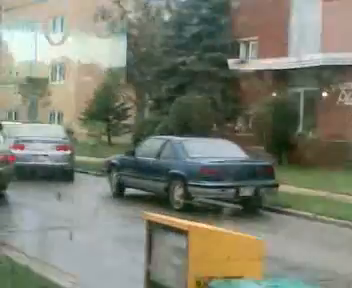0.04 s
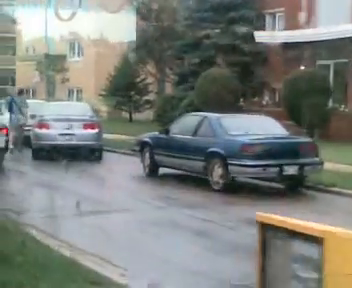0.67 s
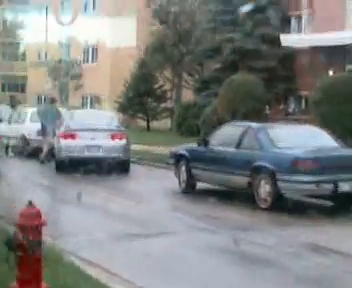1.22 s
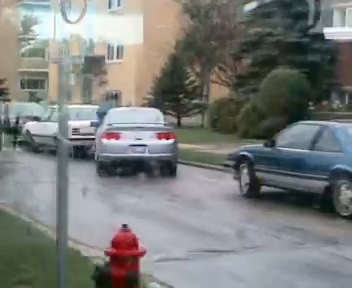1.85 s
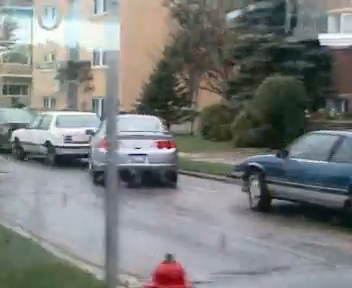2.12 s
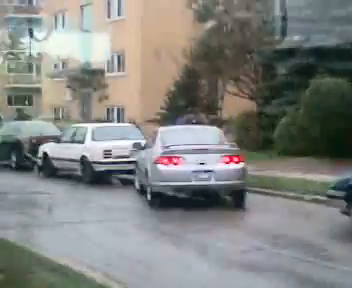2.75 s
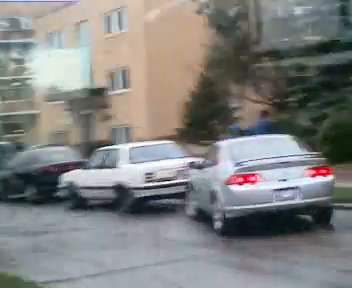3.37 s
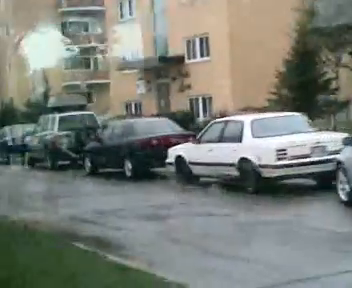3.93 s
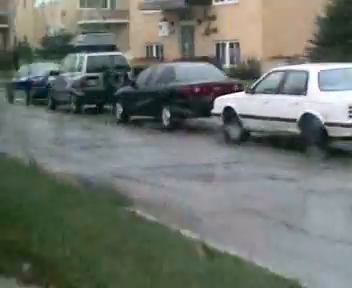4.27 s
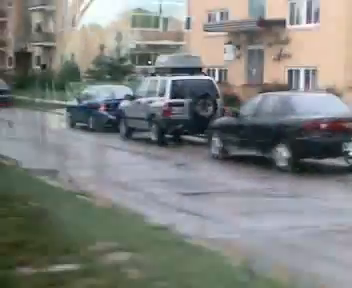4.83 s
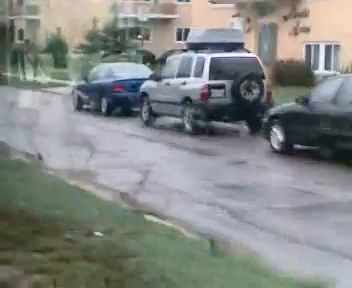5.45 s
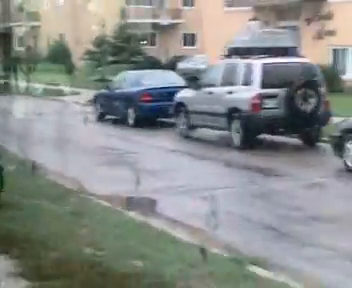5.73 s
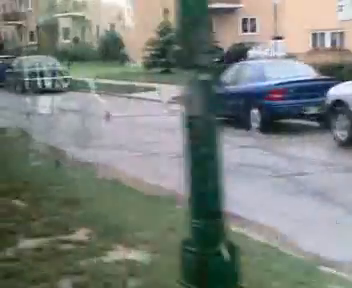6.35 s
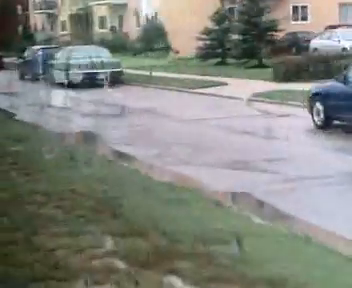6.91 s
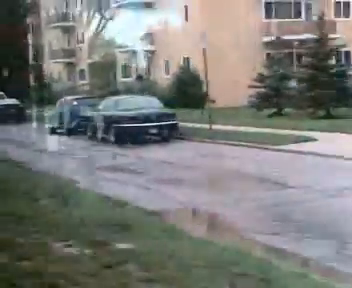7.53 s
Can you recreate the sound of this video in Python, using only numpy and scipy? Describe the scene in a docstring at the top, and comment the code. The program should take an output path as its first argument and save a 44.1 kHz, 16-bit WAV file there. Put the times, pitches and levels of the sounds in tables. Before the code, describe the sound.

Heard from a seat inside a city bus, the diesel engine pulls away with a deep, booming drone that rises steadily in pitch. The wheels thump dully over seams in the wet street, shaking loose fittings and throwing brief spray. After about five seconds the engine shifts up, drops a little and pulls on over road rumble. Near the end, compressed air hisses softly.

```python
"""City bus on a wet street

From a seat inside: the six-cylinder diesel pulls away, shifts up at 5.2 s and pulls on. Its orders boom
as they sweep through the cabin's resonances, over road rumble and combustion clatter. Below the floor
the wheels thump over seams, shake loose fittings and throw spray; near the end compressed air hisses."""
import sys
import numpy as np
from scipy import signal
from scipy.fft import rfft, irfft
from scipy.io import wavfile

SR = 44100
rng = np.random.default_rng(int(sys.argv[2]) if len(sys.argv) > 2 else 0)


def unload_wav(signal):
    """Save mono or channel-first audio to the path in sys.argv[1] as 16-bit WAV at rate SR, clipped to [-1, 1]."""
    wavfile.write(
        sys.argv[1],
        SR,
        np.round(np.clip(np.atleast_2d(signal).T, -1, 1) * 32767).astype(np.int16),
    )


N = 338688
TIME = np.arange(N) / SR

# The crank climbs until the upshift. Each row: time in seconds, speed in turns per second.
CRANK_SPEED = [(0.0, 17.6), (0.3, 19.2), (0.8, 21.03), (1.3, 23.33), (1.75, 24.72), (2.26, 26.36),
               (2.87, 28.02), (3.35, 29.48), (3.86, 30.72), (4.5, 31.45), (5.12, 32.25), (5.22, 31.3),
               (5.38, 30.35), (5.55, 29.78), (5.98, 29.09), (6.46, 29.07), (7.43, 29.49), (7.68, 29.5)]
# Level laws, ahead of cabin gain and swells. Each pair: dB at CRUISE, dB per extra turn per second.
CRUISE = 30  # crank turns per second
FIRING, UNEVEN_FIRING = (-17, 0.57), (-35.5, 0.06)
FIRING_2ND, FIRING_3RD, FIRING_4TH, FIRING_5TH = (-30, 0.98), (-40.5, -0.6), (-50, -1), (-44.5, 0.56)
FAN, FAN_OCTAVE, PUMP, RUMBLE = (-27, 1), (-37.5, 0.4), (-42.5, 1.2), (-38, 0.66)
SHAFT_SHAKE, SHAFT_NINTH, SHAFT_HUM = (-50, 1), (-43, 3), (-33.5, 1)
# The engine strains twice. Each row: start in seconds, length in seconds, gain in dB.
STRAINS = [(1.09, 0.43, 5.5), (2.04, 0.69, 2.5)]
# Single tones surge or ease. Each row: start and length in seconds, crank multiple, gain in dB.
SURGES = [(0, 0.67, 9, -5), (0.025, 0.39, 12, -5), (1.027, 0.25, 10, 3.5), (1.3, 0.4, 10, -7),
          (1.654, 0.23, 15, 7.5), (1.8, .38, 18.6, 14), (2.1, 0.35, 8.6, 3), (2.45, 0.45, 18.6, -4.5),
          (2.48, 0.77, 8.6, -5), (3.3, 0.42, 9, -2.5), (6.552, 3.7, 20, 7)]
# Weak low orders of crank and camshaft: their crank multiples, then their base levels in dB.
WEAK_ORDERS = [1.5, 2, 2.5, 3.5, 4, 5, 5.5, 6.5, 7.5, 8, 11, 13]
WEAK_DB = [-48, -42, -45.5, -43, -53.5, -41.5, -48, -46.5, -46, -44, -58, -52.5]
# High orders of engine and fan: their crank multiples, then their base levels in dB.
HIGH_ORDERS = [21, 22, 24, 25.5, 27, 28.5, 30, 31.5, 33, 34.5, 36, 37.5, 40, 42, 45]
HIGH_DB = [-60, -64, -61, -58.5, -61.5, -59.5, -55.5, -63, -63, -63, -66, -61, -62, -62, -66]
# Cabin resonances, then pitches that cancel at the seat. Each row: pitch in Hz, width in Hz, gain in dB.
CABIN_BOOMS = [(58.8, 8.3, -5.5), (64.05, 6, -4.5), (86.13, 10.6, -1.23), (96.6, 19, -3.5),
               (132.3, 42, -2.5), (156.1, 11, 0), (185.6, 19, -5.5), (201.2, 14, -2.5), (228.6, 13, -1.2),
               (241.5, 25, -0.5), (269.1, 21, 1.4), (291.3, 22.3, -1.5), (378.1, 23, -2.7), (444, 20, -9.5),
               (487, 9.1, -2.3), (513, 21.3, 2), (556.5, 27.8, -4), (578, 4.1, -3), (633, 8.7, -16)]
SEAT_NULLS = [(110.5, 4.2, -11.5), (151.2, 6.5, -6.5), (210, 2.5, -8), (255.3, 9.2, -8),
              (277.7, 9.4, -10.5), (323.6, 22, -13.5)]
# How the cabin passes the high orders. Each row: frequency in Hz, gain in dB.
CABIN_TREBLE = [(400, 5), (510, 1.5), (590, -3.5), (630, -10.5), (680, -3.5), (770, 1), (880, -7),
                (960, -5.5), (1060, .5), (1180, -8), (1310, 1), (1400, 2), (1480, -7.5)]
# Clatter, harder under load. Each row: time in seconds, base level in dB.
CLATTER_LEVEL = [(0, -48.5), (.7, -50.5), (1.25, -49.5), (2.1, -47), (5.9, -48), (7.68, -47)]
# Panels that ring with it. Each row: pitch in Hz, width in Hz, relative level in dB.
PANELS = [(797, 74, -29), (954, 58, -23.5), (1359, 95, -19), (1423, 30, -23), (2572, 46, -22)]
# Belts slip a little at speed. Each row: crank turns per second, pump cycles or shaft turns per turn.
PUMP_RATIO = [(27, 18.62), (29.5, 18.66), (30.6, 18.52), (32, 18.5)]
SHAFT_RATIO = [(26, .863), (29.4, .863), (30.3, .852), (32, .849)]
# The octave of the shaft's hum swells and fades. Each row: time in seconds, level in dB.
SHAFT_OCTAVE = [(1.5, -70), (1.9, -44.5), (2.2, -64.5), (3.3, -55.5), (3.6, -44), (3.9, -58), (4.25, -48),
                (4.6, -50), (5.1, -58.5), (7.1, -57.5), (7.5, -50.5)]
# A panel's whine, the transmission shifting up, a high overtone ringing a panel as the bus pulls away, and the
# turbocharger's whistle. Each row: time in seconds, pitch in Hz, level in dB.
PANEL_WHINE = [(1.7, 1245, -75), (2.15, 1303, -53.5), (2.85, 1357, -53), (3.05, 1378, -59),
               (3.5, 1402, -54.5), (4.2, 1405, -61), (5.2, 1410, -59.5), (6, 1370, -63.5),
               (7.68, 1395, -62)]
UPSHIFT = [(5.1, 859, -100), (5.22, 804, -62), (5.42, 795, -55), (5.6, 715, -69), (5.75, 725, -100)]
EARLY_WHINE = [(0, 734, -56), (.12, 800, -47.5), (.27, 795, -49), (.45, 830, -60), (.62, 830, -49.5),
               (.95, 850, -68)]
TURBO = [(1.3, 5370, -92), (1.8, 5370, -76), (2.6, 5390, -74), (3.3, 5360, -92)]
# Tyre roar grows with road speed. Each row: time in seconds, level in dB.
TYRE_LEVEL = [(0, -61.5), (2.5, -58), (3.5, -47), (4.8, -45.5), (6, -40.5), (7.68, -43.5)]
# Low thumps; those at 0.876 and 4.642 s are brief knocks, the rest road seams. Each row: start in seconds,
# strength in dB, pitch in Hz, decay in seconds, rattle in dB.
THUMPS = [(0.876, -41, 170, 0.022, -42.5), (2.113, -25, 183, 0.021, -43), (2.643, -17.5, 125, 0.022, -31),
          (2.759, -39, 33, 0.1, -52), (3.631, -30.5, 62, 0.088, -48), (3.859, -42, 42, 0.039, -53),
          (4.492, -43, 160, 0.036, -41), (4.642, -26, 190, 0.012, -54.5), (5.07, -37, 62, .06, -51.5),
          (5.28, -36, 45, 0.044, -49), (6.51, -33, 70, .04, -42)]
# Light ticks; the one at 0.884 s tops a faint background knock. Each row: start in seconds, level in dB.
TICKS = [(0.42, -52), (0.884, -56), (2.604, -51.5), (3.704, -49), (3.94, -47), (5.189, -47), (5.29, -46)]
# Fittings squeak. Each row: start in seconds, length in seconds, pitch in Hz, level in dB.
SQUEAKS = [(3.36, .14, 3150, -62), (5.165, .06, 5165, -64), (5.25, .055, 5165, -64)]
# Bursts of spray. Each row: start in seconds, length in seconds, level in dB.
SPLASHES = [(0.882, 0.24, -59.5), (2.587, 0.42, -47), (3.627, 0.38, -50.5), (5.159, 0.16, -54.5)]
# The colour of each noise from the seat. Each row: frequency in Hz, relative spectral density in dB.
CLATTER_SPECTRUM = [(300, -11), (600, -2), (800, -3.5), (1000, -4.5), (1200, -6), (1600, -7), (2000, -10.5),
                    (2450, -11.5), (2800, -17), (3600, -17.5), (4400, -24), (5400, -28), (6000, -30.5),
                    (7300, -42.5)]
INTAKE_SPECTRUM = [(3000, -2.5), (4500, 2.5), (5600, -2.5), (7200, -12.5)]
RUMBLE_SPECTRUM = [(10, -24), (26, -7), (45, -10.5), (80, -5.5), (115, -6.5), (160, 2.5), (200, 0.5),
                   (250, -1.5), (300, 0), (345, -7), (390, -7), (460, -10.5), (540, -14), (700, -28.5),
                   (1100, -45)]
TYRE_SPECTRUM = [(100, -6), (175, 5), (230, -9), (340, 1), (430, -2.5), (560, -7), (700, -9.5),
                 (900, -29.5)]
RATTLE_SPECTRUM = [(150, 7), (310, 12.5), (450, 0.5), (650, -21.5), (790, 3), (980, -6), (1200, -18.5),
                   (2500, -21), (4000, -23.5), (7000, -33.5)]
TICK_SPECTRUM = [(500, -3.5), (900, 0.5), (1500, -6.5), (2400, 2.5), (3600, -9.5), (5500, -19), (7300, -25)]
SPRAY_SPECTRUM = [(500, -3), (1500, -1.5), (2600, -6), (3200, -9), (4400, -12), (5600, -16.5), (7300, -22)]
AIR_SPECTRUM = [(1200, -18), (2800, 2.5), (4200, 2.5), (4800, 7), (5600, -3), (6400, 3), (7500, -0.5)]
VENT_SPECTRUM = [(300, 6.5), (900, -3), (1500, -11), (2300, -5.5), (2900, -6.5), (3800, -7.5), (4700, -9.5),
                 (5400, -15.5), (5900, -17), (7300, -26)]


def firing(turns):
    """Three firings a turn make the deep note and its overtones; unequal cylinders add order 4.5."""
    out = order_gain(FIRING, 3) * tone(3 * turns, rough=0.036, flutter_hz=11)
    out += order_gain(UNEVEN_FIRING, 4.5) * tone(4.5 * turns, rough=0.046, flutter_hz=1.3)
    strain = amp(strain_db())
    for multiple, law in (6, FIRING_2ND), (9, FIRING_3RD), (12, FIRING_4TH), (15, FIRING_5TH):
        overtone = tone(multiple * turns + rng.random(), rough=0.09, flutter_hz=8)
        out += strain * order_gain(law, multiple) * overtone
    return out


def fan(turns, blades=10):
    """The cooling fan's blades hum at their passing rate and its octave."""
    hum = order_gain(FAN, blades) * tone(blades * turns, rough=0.07, flutter_hz=13)
    octave = order_gain(FAN_OCTAVE, 2 * blades) * tone(2 * blades * turns, rough=0.17, flutter_hz=14)
    return hum + octave


def weak_orders(turns):
    """Faint low tones of crank and camshaft stand out as they cross a cabin resonance."""
    return sum(amp(db) * boom(multiple) * tone(multiple * turns + rng.random(), rough=0.13, flutter_hz=3)
               for multiple, db in zip(WEAK_ORDERS, WEAK_DB))


def high_orders(turns, fade_depth_db=3.5, fade_hz=1.5):
    """Thin overtones climb with the revs, each fading in and out."""
    speed, out = curve(CRANK_SPEED), np.zeros(N)
    low_revs_db = 0.3 * np.minimum(speed - 23, 0)  # weaker below 23 turns per second
    for multiple, db in zip(HIGH_ORDERS, HIGH_DB):
        cabin_db = np.interp(multiple * speed, *np.transpose(CABIN_TREBLE))
        fade_db = fade_depth_db * (np.tanh(wander(fade_hz)) - 0.5)
        overtone = tone(multiple * turns + rng.random(), rough=0.3, flutter_hz=4.1)
        out += amp(db + cabin_db + fade_db + low_revs_db) * overtone
    return out


def clatter(turns, pulse_depth=0.076, knock_hz=2450):
    """Combustion noise comes through the floor, pulsing slightly with each firing, and rings panels."""
    puffs = noise() * np.exp(pulse_depth * np.cos(2 * np.pi * 3 * turns))
    ringing = sum(amp(db) * resonate(puffs, hz, width) for hz, width, db in PANELS)
    knock = colour(puffs, CLATTER_SPECTRUM) + ringing
    treble = signal.sosfiltfilt(signal.butter(4, knock_hz, "high", fs=SR, output="sos"), knock)
    hardness = amp(3 * np.minimum(curve(CRANK_SPEED) - 25, 0))  # duller below 25 turns per second
    return amp(curve(CLATTER_LEVEL)) * (knock - treble + hardness * treble)


def pump():
    """A belt-driven pump whines just under the fan's octave."""
    multiple, cycles = belt_drive(PUMP_RATIO)
    return order_gain(PUMP, multiple) * tone(cycles, rough=0.081, flutter_hz=3.1)


def accessory_shaft():
    """A belt-driven shaft hums between the engine's orders; its unbalance shakes the floor."""
    ratio, turns = belt_drive(SHAFT_RATIO)
    out = amp(driven_db(SHAFT_SHAKE)) * tone(turns, rough=0.3, flutter_hz=3.8)
    for multiple, law in (9, SHAFT_NINTH), (10, SHAFT_HUM):
        out += order_gain(law, multiple * ratio) * tone(multiple * turns, rough=0.047, flutter_hz=13)
    return out + amp(curve(SHAFT_OCTAVE)) * tone(20 * turns, rough=0.11, flutter_hz=9)


def panel_whine():
    """A wavering whine near 1.3-1.4 kHz as high engine overtones ring a panel."""
    cycles = np.cumsum(curve(PANEL_WHINE)) / SR
    return amp(curve(PANEL_WHINE, column=2)) * tone(cycles, rough=0.8, flutter_hz=18)


def transmission():
    """A high engine overtone rings a panel near 800 Hz as the bus pulls away, and the transmission whines
    downward at the upshift."""
    return whistle(UPSHIFT, width_hz=32) + whistle(EARLY_WHINE, width_hz=110)


def turbo(intake_above_db=7.5):
    """The turbocharger spools up: a thin whistle in a rush of intake air."""
    intake_gain = amp(curve(TURBO, column=2) + intake_above_db)
    return whistle(TURBO, width_hz=180) + intake_gain * colour(noise(), INTAKE_SPECTRUM)


def rumble():
    """The road shakes the body in uneven swells, harder on broken asphalt and as the engine strains."""
    asphalt_db = 5.4 * arch(start=3.53, length=0.41)
    swell_db = asphalt_db + 0.5 * strain_db() + wander(23)
    return amp(driven_db(RUMBLE) + swell_db) * colour(noise(), RUMBLE_SPECTRUM)


def tyres():
    """The rolling tyres roar low beneath the cabin."""
    return amp(curve(TYRE_LEVEL)) * colour(noise(), TYRE_SPECTRUM)


def thumps(rise_s=0.024, rattle_decay_s=0.041):
    """Dull thumps with a rattle: two are brief knocks, the rest seams jolting the body."""
    out, rattle = np.zeros(N), colour(noise(), RATTLE_SPECTRUM)
    for start, db, hz, decay, rattle_db in THUMPS:
        t = since(start)
        swell = 2 * (1 - np.exp(-t / rise_s))
        out += amp(db) * swell * np.exp(-t / decay) * np.sin(2 * np.pi * hz * t)
        out += amp(rattle_db) * swell * np.exp(-t / rattle_decay_s) * rattle
    return out


def ticks(decay_s=0.012):
    """Light, dry ticks in the cabin, each a burst of noise that dies at once."""
    strength = sum(amp(db) * (TIME >= start) * np.exp(-since(start) / decay_s) for start, db in TICKS)
    return strength * colour(noise(), TICK_SPECTRUM)


def squeaks():
    """Fittings give short, scratchy chirps as the body flexes."""
    return sum(amp(db) * arch(start, length) * tone(hz * TIME, rough=0.55, flutter_hz=60)
               for start, length, hz, db in SQUEAKS)


def spray(rise_s=0.0088, sink_db_per_s=10, tail_s=0.11):
    """Outside, water hits the wheel arch in a dense rush that sinks and then dies away."""
    power = np.zeros(N)
    for start, length, db in SPLASHES:
        t = since(start)
        rush = amp(db - sink_db_per_s * t) * (1 - np.exp(-t / rise_s))
        tail = np.exp(-since(start + length) / tail_s)
        power += (rush * tail) ** 2
    drops = noise() * amp(1.2 * wander(200, size=8192))
    return np.sqrt(power) * colour(drops, SPRAY_SPECTRUM)


def air_valve(opens_s=6.75, rise_s=0.1, level_db=-56, fall_db_per_s=8.5):
    """A valve lets out compressed air under the floor; the hiss sinks with the pressure."""
    t = since(opens_s)
    opening = np.minimum(t / rise_s, 1)
    return opening * amp(level_db - fall_db_per_s * t) * colour(noise(), AIR_SPECTRUM)


def vent(level_db=-57.5):
    """The heater ducts hiss softly behind everything else."""
    return amp(level_db) * colour(noise(), VENT_SPECTRUM)


def boom(multiple):
    """Gain at the seat for a tone at this crank multiple (a number or a curve), with its surges."""
    pitches = np.linspace(20, 700, 1400)

    def bell(hz, width):
        """Power of one resonance, 1 at its centre."""
        return 1 / (1 + (2 * (pitches - hz) / width) ** 2) ** 2
    floor = amp(-16.5) ** 2  # what passes between the resonances
    power = floor + sum(amp(db) ** 2 * bell(hz, width) for hz, width, db in CABIN_BOOMS)
    dips_db = sum(db * bell(hz, width) for hz, width, db in SEAT_NULLS)
    cabin = np.interp(multiple * curve(CRANK_SPEED), pitches, np.sqrt(power) * amp(dips_db))
    surge_db = sum(db * arch(start, length) for start, length, order, db in SURGES
                   if abs(np.mean(multiple) - order) < 0.25)
    return cabin * amp(surge_db)


def driven_db(law):
    """Level of a part that follows the crank speed."""
    db, db_per_speed = law
    return db + db_per_speed * (curve(CRANK_SPEED) - CRUISE)


def order_gain(law, multiple):
    """Strength of an engine-driven tone after crossing the cabin to the microphone."""
    return amp(driven_db(law)) * boom(multiple)


def strain_db(edge_s=0.08):
    """Extra level that builds and eases as the engine strains."""
    return sum(db * np.clip(np.minimum(TIME - start, start + length - TIME) / edge_s, 0, 1)
               for start, length, db in STRAINS)


def belt_drive(ratios):
    """A belt-driven part's ratio to the crank, and its running count of cycles."""
    speed = curve(CRANK_SPEED)
    ratio = np.interp(speed, *np.transpose(ratios))
    return ratio, np.cumsum(speed * ratio) / SR


def tone(cycles, rough, flutter_hz):
    """A tone on a running count of cycles, near rms 1; roughness shakes its strength and phase."""
    angle = 2 * np.pi * cycles
    in_phase = (1 + rough * wander(flutter_hz)) * np.cos(angle)
    quadrature = rough * wander(flutter_hz) * np.sin(angle)
    return (in_phase + quadrature) * np.sqrt(2 / (1 + 2 * rough ** 2))


def whistle(rows, width_hz):
    """A fuzzy tone: narrow noise that follows a table of pitch and level."""
    return amp(curve(rows, column=2)) * resonate(noise(), curve(rows), width_hz)


def resonate(x, hz, width_hz):
    """Passes x through a steep resonance that follows the pitch hz, at rms 1."""
    carrier = np.exp(2j * np.pi * np.cumsum(hz * np.ones(N)) / SR)
    pole = np.exp(-np.pi * width_hz / SR)
    envelope = signal.lfilter([1], [1, -2 * pole, pole * pole], x / carrier)
    return unit((carrier * envelope).real)


def colour(x, spectrum):
    """Filters x by a spectrum of (Hz, dB) points, falling away past its ends, at rms 1."""
    hz, db = np.transpose(spectrum)
    log_f, log_points = np.log(np.fft.rfftfreq(N, 1 / SR) + 1), np.log(hz)
    outside = np.maximum(log_points[0] - log_f, 0) + np.maximum(log_f - log_points[-1], 0)
    gain = amp(np.interp(log_f, log_points, db) - 40 * outside)
    return unit(irfft(rfft(x) * gain, N))


def wander(rate_hz, size=1024):
    """Smooth random drift near rms 1, up to about rate_hz."""
    f = np.fft.rfftfreq(size, N / SR / size)
    slow = irfft(rfft(rng.standard_normal(size)) / (1 + (f / rate_hz) ** 2))
    return np.interp(TIME, np.linspace(0, N / SR, size), unit(slow))


def curve(rows, column=1):
    """One column of a table, joined by straight lines in time."""
    rows = np.array(rows, float)
    return np.interp(TIME, rows[:, 0], rows[:, column])


def arch(start, length):
    """Rises from 0 to 1 and falls back over a span of seconds."""
    return np.sin(np.pi * np.clip((TIME - start) / length, 0, 1))


def since(start):
    """Seconds since start, 0 before it."""
    return np.maximum(TIME - start, 0)


def noise():
    """White noise."""
    return rng.standard_normal(N)


def amp(db):
    """Decibels to gain."""
    return 10 ** (np.asarray(db) / 20)


def unit(x):
    """Scales to rms 1."""
    return x / np.sqrt(np.mean(x ** 2) + 1e-20)


def scene():
    """Everything as it reaches one seat in the cabin, in mono."""
    turns = np.cumsum(curve(CRANK_SPEED) * (1 + 0.00051 * wander(5.5))) / SR
    engine = firing(turns) + fan(turns) + weak_orders(turns) + high_orders(turns) + clatter(turns)
    whines = pump() + accessory_shaft() + panel_whine() + transmission() + turbo()
    body = rumble() + tyres() + thumps() + ticks() + squeaks()
    return (engine + whines + body + spray() + air_valve() + vent())[None]


def record(dry):
    """A small microphone at the seat, deaf above about 7.5 kHz; both ends fade briefly."""
    faded = dry * signal.windows.tukey(N, 0.002)
    lowpass = signal.firwin(511, 7520, window=("kaiser", 9), fs=SR)
    return signal.oaconvolve(faded, lowpass[None], "same")


dry = scene()
out = record(dry)
unload_wav(out)
```